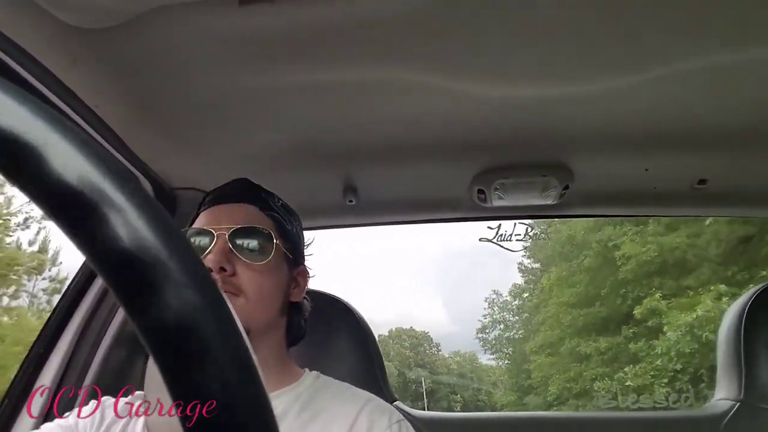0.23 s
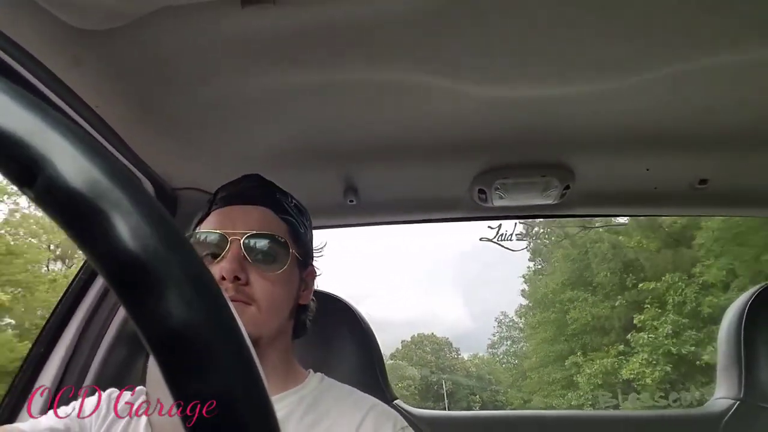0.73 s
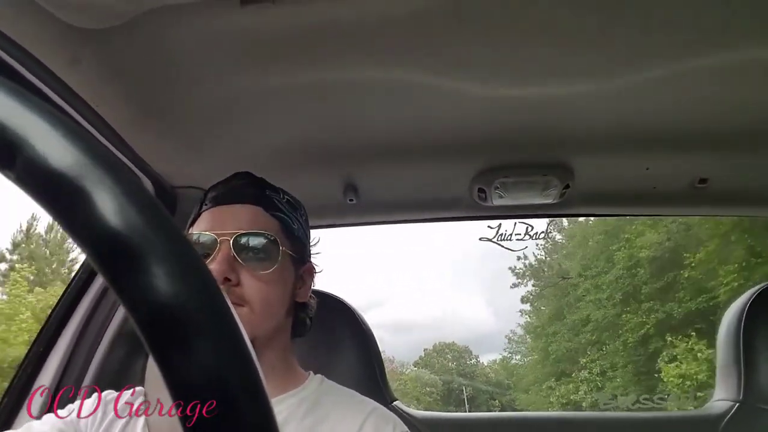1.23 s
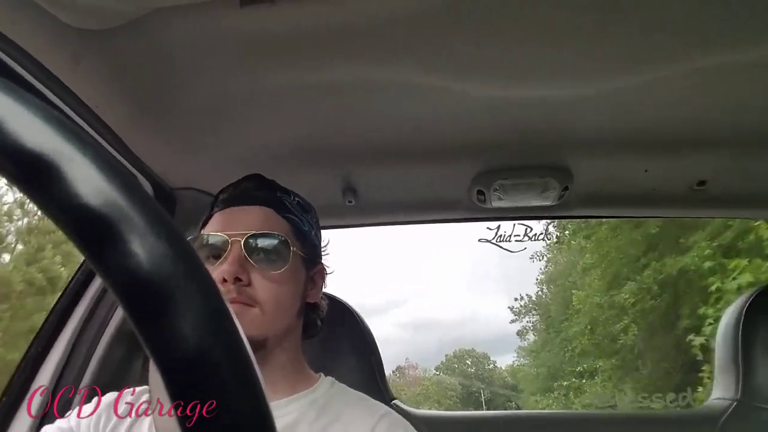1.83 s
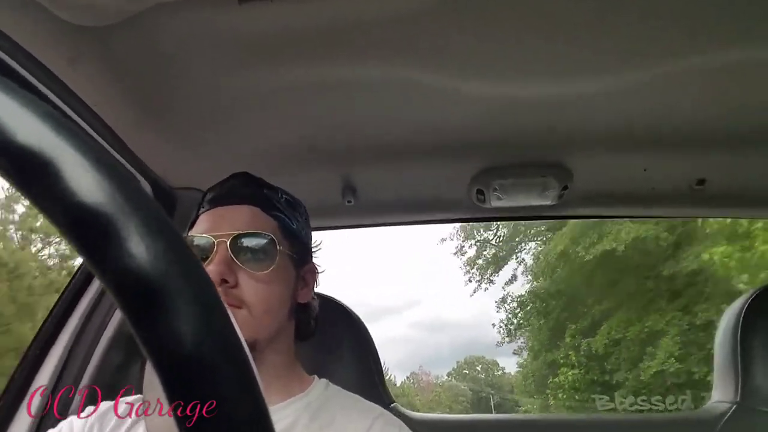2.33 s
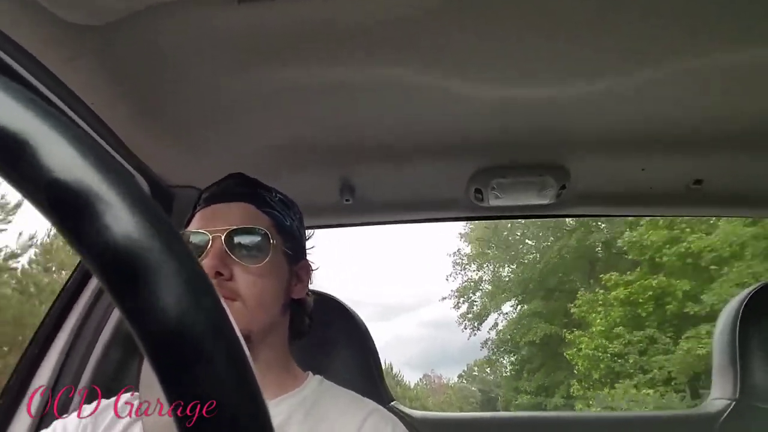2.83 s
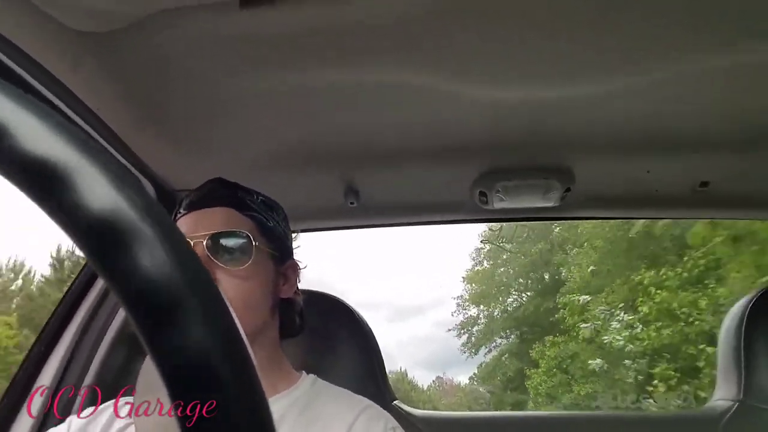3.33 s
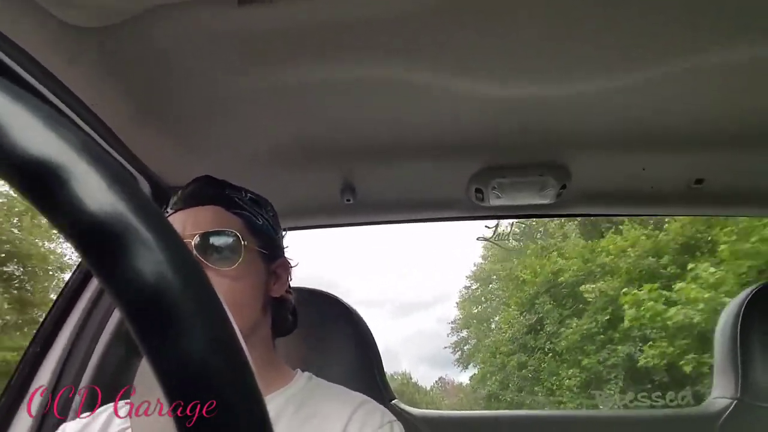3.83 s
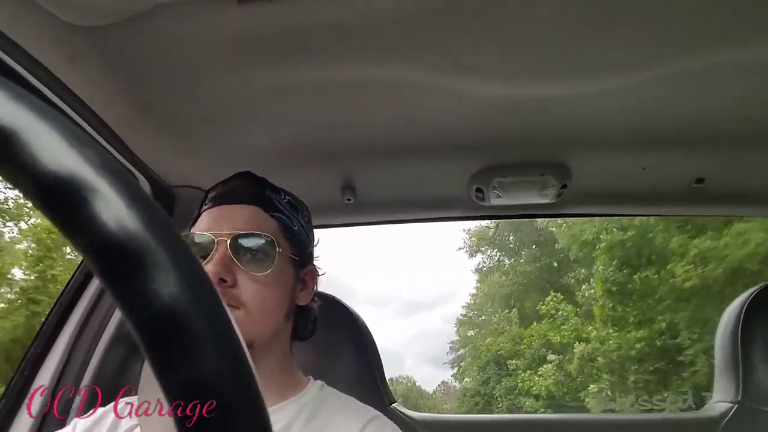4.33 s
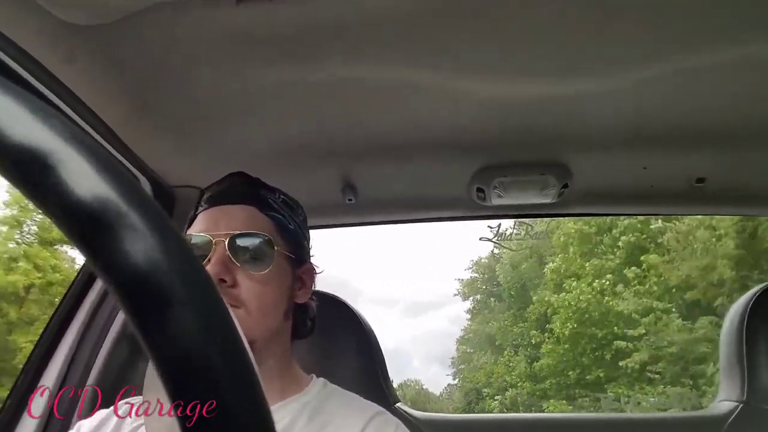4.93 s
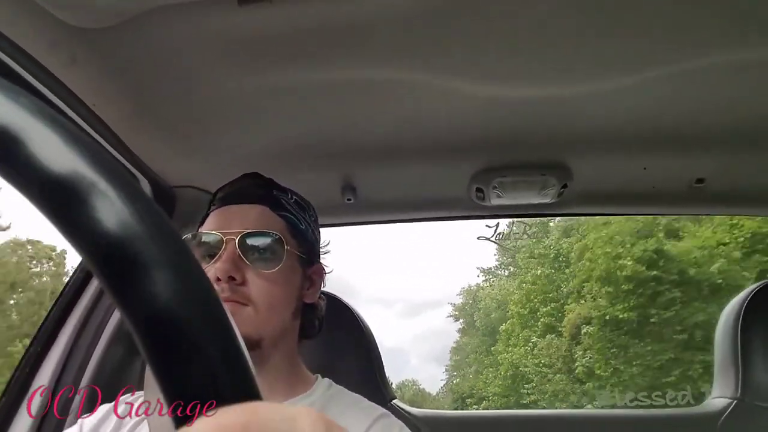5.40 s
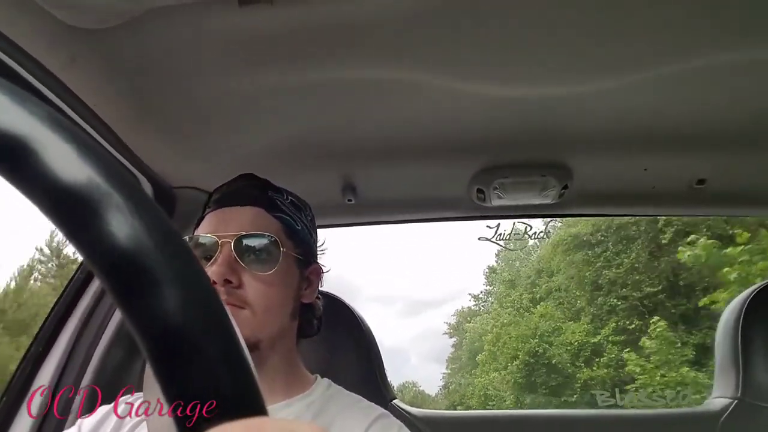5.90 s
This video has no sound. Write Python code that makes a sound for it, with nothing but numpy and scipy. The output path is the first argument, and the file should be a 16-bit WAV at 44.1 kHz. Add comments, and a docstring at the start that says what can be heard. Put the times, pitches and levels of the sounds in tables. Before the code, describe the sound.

The sound opens inside the cab of a moving diesel pickup with a window open: deep rumble, steady tyre and wind roar, and a small gust with a faint hum around 0.6 seconds. At about 1 second the truck accelerates. Intake air hisses, the rumble grows much fuller, and a rough, low exhaust drone swells in by 1.7 seconds. A breathy turbo whistle climbs about an octave between 1 and 2.5 seconds, creeps slightly higher until around 3 seconds, then holds with a light flutter. The drone stays nearly level in pitch, with a burble beneath it, while the hiss eases. Irregular wind puffs and dull thumps hit the microphone, mostly on the left, with sharp pops near 2.4 and 4.5 seconds. Trim rattles faintly a few times between 1.8 and 3.4 seconds. Drone, whistle and roar continue until the end, just past 6 seconds.

```python
"""Inside the cab of a V8 diesel pickup, rolling with a window open. Tyres and wind roar, the cab air
rumbles and thumps, eddies slap the microphone's two ports, and trim rattles faintly.
The driver floors it: the cylinder firings drone in the exhaust, air hisses into the intake,
and the turbo wheel spools up to a breathy whistle, then holds."""
import sys
import numpy as np
from scipy import signal
from scipy.fft import rfft, irfft
from scipy.io import wavfile

SR = 44100
rng = np.random.default_rng(int(sys.argv[2]) if len(sys.argv) > 2 else 0)


def digitize_waveform(pressure):
    """Quantize a signal to 16-bit integers and store it at the path in sys.argv[1].

    Rows of a 2-D input are taken as channels; values are limited to [-1, 1].
    """
    field = np.atleast_2d(pressure).T
    bounded = np.clip(field, -1, 1)
    quanta = np.round(bounded * 32767).astype(np.int16)
    wavfile.write(sys.argv[1], SR, quanta)


N = 271656
TIME_S = np.arange(N) / SR
BINS_HZ = np.maximum(np.fft.rfftfreq(N, 1 / SR), 1)
PEDAL_S, LOAD_LAG_S, LOAD_RISE_S = 1, 0.15, 0.727

# cab air at the two ports: freq_hz, correlation
RUMBLE_CORRELATION = [(30, 0.86), (60, 1), (130, 0.79), (290, 0.4), (600, 0.24)]


def from_db(db):
    """Decibels to gain."""
    return 10 ** (np.asarray(db) / 20)


def unit_rms(x):
    """Scale to rms 1."""
    return x / np.sqrt(np.mean(x ** 2) + 1e-20)


def pan(left_db):
    """Stereo gains; left_db is left minus right."""
    return from_db(np.array([[.5], [-.5]]) * left_db)


def bell(centre_s, half_s):
    """Gaussian swell to 1 and back."""
    return np.exp(-np.minimum(((TIME_S - centre_s) / half_s) ** 2, 50))


def ramp(start_s, rise_s):
    """Smooth step from 0 to 1."""
    return .5 - .5 * np.cos(np.pi * np.clip((TIME_S - start_s) / rise_s, 0, 1))


def over_time(points):
    """Curve at every sample."""
    time_s, value = np.transpose(points)
    return np.interp(TIME_S, time_s, value)


def over_hz(points):
    """Curve at every bin, interpolated in log frequency."""
    freq_hz, value = np.transpose(points)
    return np.interp(np.log(BINS_HZ), np.log(freq_hz), value)


def bumps(rows):
    """Gaussian peaks and hollows, dB at every bin."""
    return sum(db * np.exp(-2 * ((BINS_HZ - hz) / width_hz) ** 2) for hz, width_hz, db in rows)


def noise(shape_db, correlation=0):
    """Stereo noise of given spectral shape and left-right correlation; rms 1."""
    mid, side = rfft(rng.standard_normal((2, N)))
    alike = np.clip(correlation, -1, 1)
    stereo = np.sqrt(1 + alike) * mid + np.sqrt(1 - alike) * side * [[1], [-1]]
    return unit_rms(irfft(from_db(shape_db) * stereo, N))


def drift(rate_hz):
    """Slow random wander; rms about 1."""
    size = 8192
    freq_hz = np.fft.rfftfreq(size, TIME_S[-1] / size)
    slow = irfft(rfft(rng.standard_normal(size)) / (1 + (freq_hz / rate_hz) ** 2))
    return np.interp(TIME_S, np.linspace(0, TIME_S[-1], size), unit_rms(slow))


def cab_rumble(load):
    """Cab air: a deep cruising rumble with one gust, and a fuller one under load."""
    # rumble spectrum: freq_hz, density_db
    spectrum = [(10, -55), (22, 0), (34, 0), (46, -1), (57, 3.5), (72, -6.5), (98, -0.5), (125, -8),
                (150, -8), (230, -15), (330, -26.5), (600, -31.5), (1500, -76)]
    shape_db, correlation = over_hz(spectrum), over_hz(RUMBLE_CORRELATION)
    cruising = from_db(-29.5) * noise(shape_db - 1.1 * np.log2(BINS_HZ), correlation)
    lowpass_db = -10 * np.log10(1 + (BINS_HZ / 55) ** 4)
    gust = from_db(-26) * bell(centre_s=0.65, half_s=0.16) * noise(shape_db + lowpass_db, correlation)
    pulling = from_db(-17.5 + 0.5 * drift(5.1)) * load ** 2 * noise(shape_db, correlation)
    return cruising + gust + pulling


def hum(waver_hz):
    """Faint wavering tones that swell and fade before the pull."""
    # hum tones: pitch_hz, level_db
    tones = [(220.7, -29.5), (409.1, -34)]
    chord = sum(from_db(db) * np.sin(2 * np.pi * np.cumsum(hz + waver_hz * drift(10.6)) / SR)
                for hz, db in tones)
    return chord * bell(centre_s=0.68, half_s=0.21)


def throb(cycles):
    """Uneven beat of the cylinders, repeating each engine cycle; rms 1."""
    return unit_rms(sum(np.sin(2 * np.pi * (k * cycles + rng.random())) for k in range(1, 9)))


def road_roar(load, cycles, flicker_db, throb_db):
    """Tyre, wind and combustion noise in the cab's resonances, pulsing slightly with the cylinders."""
    # roar spectrum: freq_hz, density_db
    spectrum = [(40, 4), (130, -18.5), (200, 0.5), (350, 0.5), (520, -2.5), (680, -1), (820, -2),
                (1020, -2.5), (1260, -7.5), (1500, -6.5), (1900, -14.5), (2500, -15), (3500, -26.5),
                (6000, -32.5), (14000, -37)]
    # cab resonances and hollows: freq_hz, width_hz, gain_db
    resonances = [(176.6, 8.4, 9), (221, 18, 4), (343, 21, 2), (420, 59, 2.5), (546, 28, 3), (631, 20, -3),
                  (764, 26, 3), (846, 23, -2.5), (1047, 27, 2.5), (1104, 38, -2.5), (1443, 53, 3.5),
                  (1830, 54, 3), (2112, 38, 6), (2480, 46, -2.5)]
    # roar at the two ports: freq_hz, correlation
    correlation = [(60, 1), (290, 0.89), (630, 0.39), (1400, -0.45), (3000, 0.22)]
    level_db = -29.5 + 1.73 * load + flicker_db * drift(52) + throb_db * throb(cycles)
    return from_db(level_db) * noise(over_hz(spectrum) + bumps(resonances), over_hz(correlation))


def rattles(width_hz):
    """Loose trim buzzes for an instant."""
    # trim buzzes: centre_s, half_length_s, freq_hz, level_db
    buzzes = [(0.21, 0.02, 1440, -40), (1.84, 0.006, 1300, -30), (2.217, 0.008, 1550, -29.5),
              (2.298, 0.0088, 1500, -32), (3.382, 0.0062, 1500, -31)]
    band = lambda hz: noise(-20 * np.log10(1 + ((BINS_HZ - hz) / width_hz) ** 2))
    return sum(from_db(db) * bell(centre_s, half_s) * band(hz) for centre_s, half_s, hz, db in buzzes)


def cab_echoes(x, t60_s, wet_db):
    """Glass and trim add dense, short echoes, different at each port."""
    age_s = np.arange(SR // 5) / SR
    response = rng.standard_normal((2, age_s.size)) * from_db(-60 * age_s / t60_s)
    response /= np.linalg.norm(response, axis=1, keepdims=True)
    echoes = signal.fftconvolve(x, response, axes=1)[:, :N]
    wet = from_db(wet_db)
    return (x + wet * echoes) / np.sqrt(1 + wet ** 2)


def thumps(half_s, spread_octaves, centre_hz):
    """Buffeting air gives deep, dull shoves, much alike at both ports."""
    # air shoves: centre_s, level_db
    shoves = [(1.933, -16), (2.049, -17.5), (2.192, -17), (2.337, -23), (2.874, -15), (3.303, -17),
              (3.661, -13), (4.376, -15), (5.633, -19)]
    shape_db = -12 * (np.log2(BINS_HZ / centre_hz) / spread_octaves) ** 2
    air = noise(shape_db, over_hz(RUMBLE_CORRELATION))
    return air * sum(from_db(db) * bell(centre_s, half_s) for centre_s, db in shoves)


def eddies(drive_db, lumpy_db, weak_per_s):
    """Low puffs of air on the ports; one-sided ones slap more brightly, the hardest flatten out."""
    # strong eddies: centre_s, half_length_s, level_db, left_minus_right_db
    strong = [(0.532, 0.017, -27.5, 8), (0.613, .012, -23.5, 4), (0.729, 0.022, -27, 14),
              (1.858, 0.016, -26, 14), (1.948, 0.03, -25, 7), (2.344, 0.025, -23.5, 20),
              (2.422, 0.042, -16, 7), (2.674, 0.094, -23, -8), (2.874, 0.025, -26, 3),
              (3.39, 0.041, -23.5, 5), (3.911, 0.014, -22.5, 10), (4.455, 0.035, -23, 15),
              (5.471, 0.023, -19.5, 10), (5.536, 0.017, -29.5, -29), (5.609, 0.03, -17.5, -1),
              (5.834, 0.028, -21, 3), (6.06, 0.028, -19, 4.5)]
    # puff spectrum: freq_hz, density_db
    puff_spectrum = [(12, -35), (30, -9), (100, -3.5), (245, -3.5), (400, -16.5), (800, -27), (2000, -55),
                     (6000, -77)]
    # slap spectrum: freq_hz, density_db
    slap_spectrum = [(150, -22), (350, 2), (600, 1), (900, -7), (1500, -13), (5000, -60)]
    lumps = from_db(lumpy_db * np.array([drift(110), drift(110)]))
    air = noise(over_hz(puff_spectrum))
    slap = from_db(-13.5) * noise(over_hz(slap_spectrum))
    # weak eddies, irregular, once the truck pulls; same columns
    weak = [(PEDAL_S + LOAD_RISE_S + (slot + offset) / weak_per_s, 0.024, -27.5, 9 + 20 * (side - .5))
            for slot, (offset, side) in enumerate(rng.random(size=(16, 2)))]
    puffs = sum(from_db(db) * pan(left_db) * bell(centre_s, half_s) * (air + slap * abs(left_db) / 25)
                for centre_s, half_s, db, left_db in strong + weak)
    return .45 * np.tanh(puffs * lumps * from_db(drive_db) / .45)


def pops(decay_s, snap_s, left_db):
    """Hard eddies break on the left port: pressure sinks, snaps upward and settles."""
    # breaking eddies: centre_s, level_db
    breaks = [(2.355, -13), (2.422, -14), (2.427, -13), (4.445, -8), (4.4492, -2), (4.4678, -10)]
    snap = lambda age_s: np.tanh(age_s / snap_s) * np.exp(-np.minimum(np.abs(age_s) / decay_s, 40))
    pressure = sum(from_db(db) * snap(TIME_S - centre_s) for centre_s, db in breaks)
    return pressure * pan(left_db) / pan(left_db)[0]


def intake(pulling_s, spool, cruise_db, open_db, rise_s):
    """Air rushes into the compressor: the hiss opens with the pedal and settles as boost builds."""
    opening_db = open_db + (cruise_db - open_db) * np.exp(-pulling_s / rise_s)
    settling_db = -9 * spool - 0.37 * pulling_s
    flicker_db = 0.95 * drift(14)
    dip_db = -2.5 * bell(centre_s=5.39, half_s=0.25)
    # hiss spectrum: freq_hz, density_db
    spectrum = [(800, 6), (2200, 7.5), (3000, 7.5), (3700, 3), (4400, 5.5), (5500, 0), (6700, 2.5),
                (8500, 1), (10300, -2), (11500, 0.5), (13200, 2.5), (14400, -3.5)]
    return from_db(opening_db + settling_db + flicker_db + dip_db) * noise(over_hz(spectrum))


def exhaust(cycles, load, pulling_s, waver_db, rough_db, jitter_rad):
    """Rough drone at the firing rate; unequal cylinders add a burble that grows through the pull."""
    # firing note, swelling under load: time_s, level_db
    drone_curve = [(1.1, -44), (1.38, -34), (1.65, -20.5), (2.05, -20.5), (2.38, -22.5), (2.6, -18.5),
                   (3.1, -20), (4.1, -20.5), (5.1, -21.8), (5.8, -23.5), (6.16, -21.5)]
    # burble partials: engine_cycle_multiple, relative_db
    burble_partials = [(2, -3.5), (3, -5), (4, -7), (5, 1.5), (6, -6.5), (7, -2), (10, -17.5), (11, -11),
                       (12, -28), (16, -31), (18, -20.5)]

    def partial(multiple, level_db):
        phase_rad = 2 * np.pi * (multiple * cycles + rng.random()) + jitter_rad * drift(17)
        return np.sin(phase_rad) * from_db(level_db + waver_db * drift(11.4))

    drone = partial(8, over_time(drone_curve))
    burble = sum(partial(multiple, db) for multiple, db in burble_partials)
    burble *= load * from_db(-30 + 0.48 * pulling_s)
    return (drone + burble) * from_db(rough_db * drift(40)) * pan(left_db=0.5)


def whistle(pitch_hz, width_hz, skirt_hz, skirt_db):
    """Turbulent air past the wheel: a narrow noise band with skirts; half-widths hold at top pitch."""
    core = 1 / (1 + (BINS_HZ / width_hz) ** 4)
    skirt = from_db(skirt_db) ** 2 / (1 + (BINS_HZ / skirt_hz) ** 2) ** 2
    shape_db = 10 * np.log10(core + skirt)
    phase_rad = 2 * np.pi * np.cumsum(pitch_hz) / SR
    # a slower wheel churns more slowly, narrowing the band
    churn_time_s = np.cumsum((pitch_hz / pitch_hz.max()) ** 1.1) / SR
    churn = lambda: np.array([np.interp(churn_time_s, TIME_S, side) for side in noise(shape_db)])
    return churn() * np.cos(phase_rad) + churn() * np.sin(phase_rad)


def turbo(spool, cruise_hz, boost_hz, flutter_db):
    """A fluttering whistle and two faint overtones climb with the wheel's speed."""
    # whistle loudness: time_s, level_db
    level_curve = [(0, -62), (1.05, -53), (1.3, -42), (1.47, -38.5), (1.6, -37), (1.72, -42), (1.95, -44),
                   (2.01, -38), (2.2, -35.5), (2.3, -35), (2.6, -40), (2.72, -37), (3.0, -36.7),
                   (3.2, -35.5), (3.45, -36.4), (3.72, -36.5), (3.85, -34.5), (4.05, -37.5), (4.5, -34.7),
                   (5.0, -35.5), (5.25, -38.5), (5.55, -37), (5.85, -34.5), (6.16, -38)]
    creep_hz = 104.8 * ramp(start_s=2.4, rise_s=0.8)
    pitch_hz = cruise_hz + (boost_hz - cruise_hz) * spool + creep_hz + 20 * drift(13)
    bite_db = 6.5 * np.sin(np.pi * spool ** 2)  # keener octave while gaining speed
    first = whistle(pitch_hz, width_hz=144, skirt_hz=360, skirt_db=-5.5) * pan(-2.2 * spool)
    second = whistle(2 * pitch_hz, width_hz=340, skirt_hz=750, skirt_db=-10) * from_db(-17.5 + bite_db)
    third = whistle(3 * pitch_hz, width_hz=450, skirt_hz=1100, skirt_db=-12) * from_db(-15.5) * spool
    flutter = from_db(flutter_db * drift(45))
    return (first * flutter + second + third) * from_db(over_time(level_curve))


def scene():
    """The pedal loads the engine and spools the turbo, over rumble, roar and wind."""
    # engine speed: time_s, firing_hz
    revs = [(1.25, 171.2), (1.5, 176.7), (1.85, 185), (2.25, 187.6), (2.65, 185.3), (3.3, 185.6),
            (4.3, 186.6), (5.3, 188.1), (6.16, 188.9)]
    pulling_s = np.maximum(TIME_S - PEDAL_S, 0)
    load = ramp(PEDAL_S + LOAD_LAG_S, LOAD_RISE_S)
    spool = 1 / (1 + np.exp((1.675 - TIME_S) / .285))  # 0 cruise, 1 full boost
    firing_hz = over_time(revs) + .4 * drift(4)
    cycles = np.cumsum(firing_hz) / SR / 8  # eight firings per engine cycle
    drone = exhaust(cycles, load, pulling_s, waver_db=1.0, rough_db=1.23, jitter_rad=0.1)
    lows = cab_rumble(load) + hum(waver_hz=3.5)
    wind = eddies(drive_db=1.0, lumpy_db=1.5, weak_per_s=2.7)
    wind += thumps(half_s=0.031, spread_octaves=1.3, centre_hz=44.3)
    wind += pops(decay_s=0.0016, snap_s=0.00023, left_db=18)
    roar = road_roar(load, cycles, flicker_db=0.64, throb_db=0.68) + rattles(width_hz=590)
    roar = cab_echoes(roar, t60_s=0.13, wet_db=-17)
    hiss = intake(pulling_s, spool, cruise_db=-50.5, open_db=-29, rise_s=0.28)
    whine = turbo(spool, cruise_hz=2223, boost_hz=4370, flutter_db=0.96)
    return lows + roar + wind + hiss + drone + whine


def record(dry):
    """The two microphone ports colour the sound differently; the top is cut."""
    # treble hollow of each port, left then right: freq_hz, width_hz, gain_db
    hollows = [(7720, 750, -8.5), (9800, 1060, -17)]
    # port balance: freq_hz, left_minus_right_db
    balance = [(100, -0.5), (300, 1.0), (700, 0.4), (1300, -0.6), (3000, 0.1), (6500, -2.5),
               (9000, 0.5), (11000, 1.0), (14000, 2.5)]
    ports = from_db([bumps([hollow]) for hollow in hollows]) * pan(over_hz(balance))
    lowpass = 1 / np.sqrt(1 + (BINS_HZ / 14550) ** 800)
    fades = np.minimum(np.minimum(TIME_S, TIME_S[::-1]) / .004, 1)
    return irfft(rfft(dry * fades) * ports * lowpass, N)


dry = scene()
out = record(dry)
digitize_waveform(out)
```